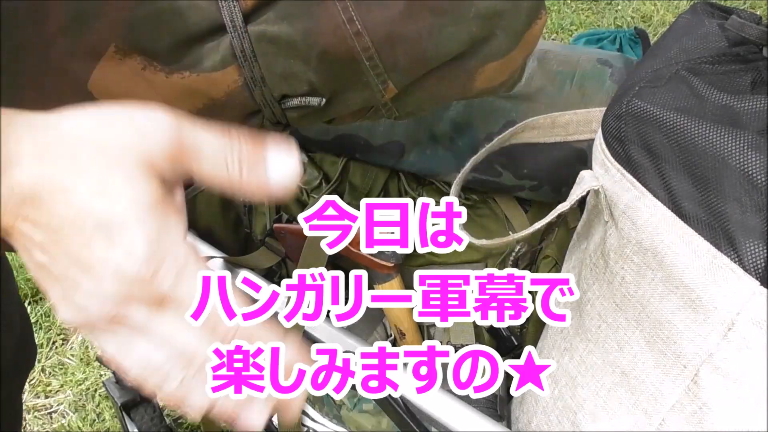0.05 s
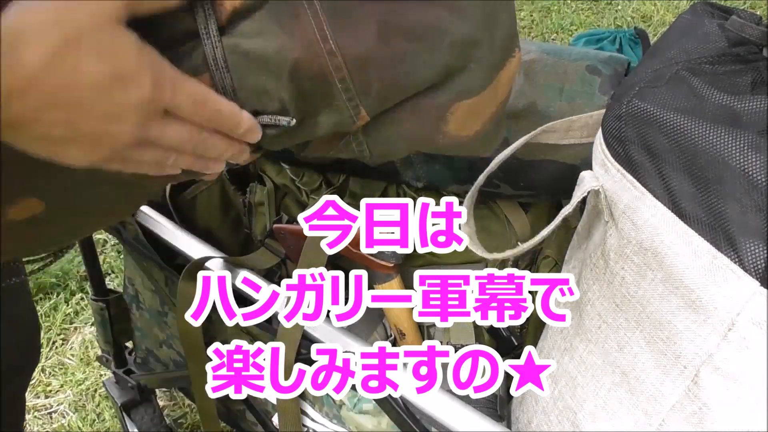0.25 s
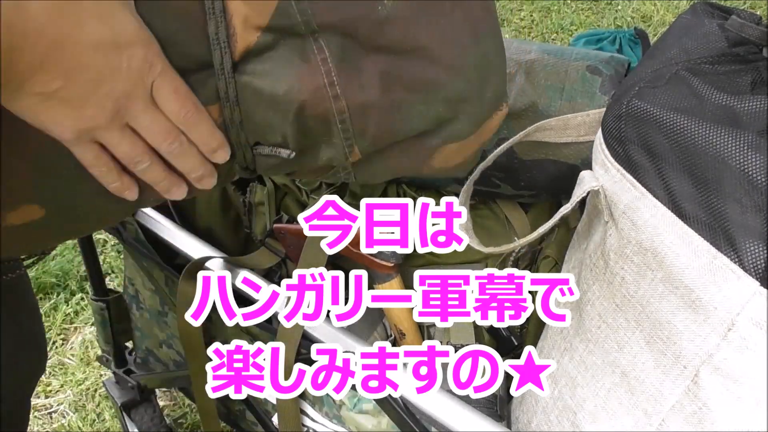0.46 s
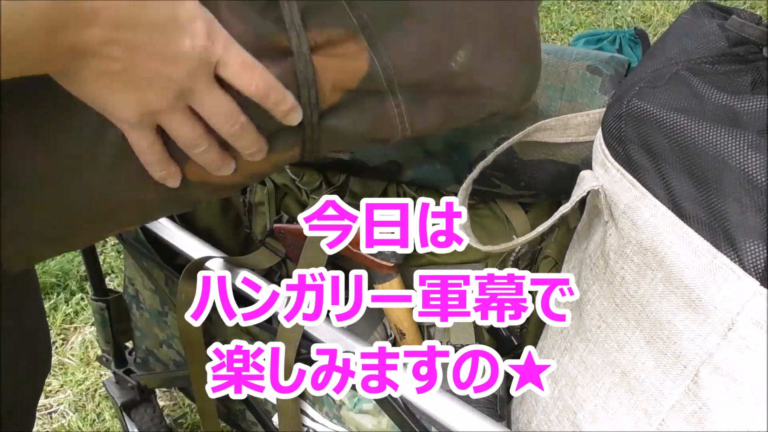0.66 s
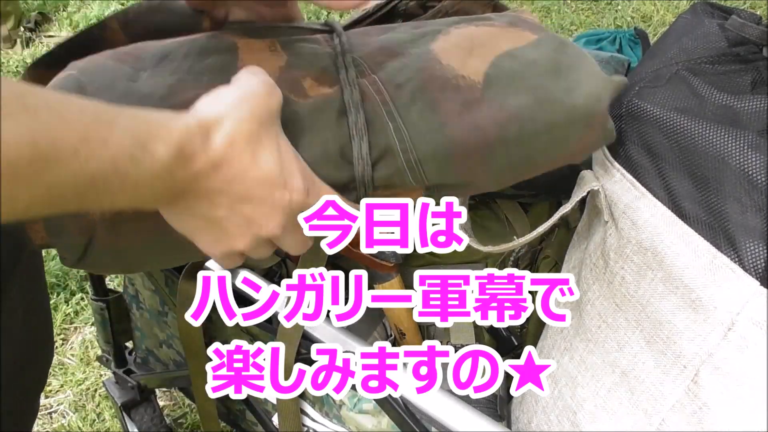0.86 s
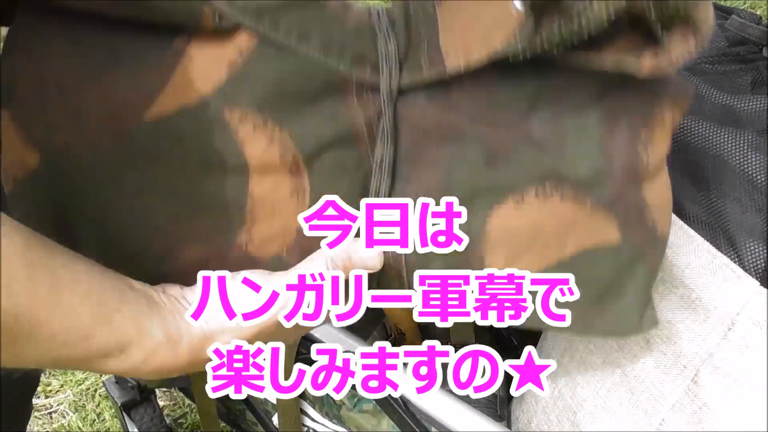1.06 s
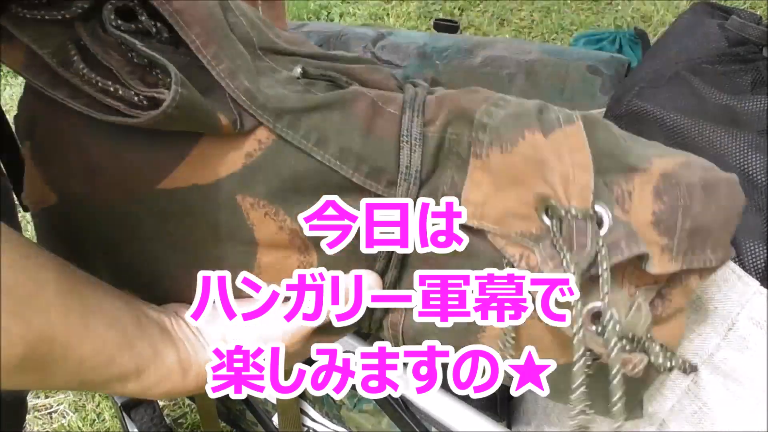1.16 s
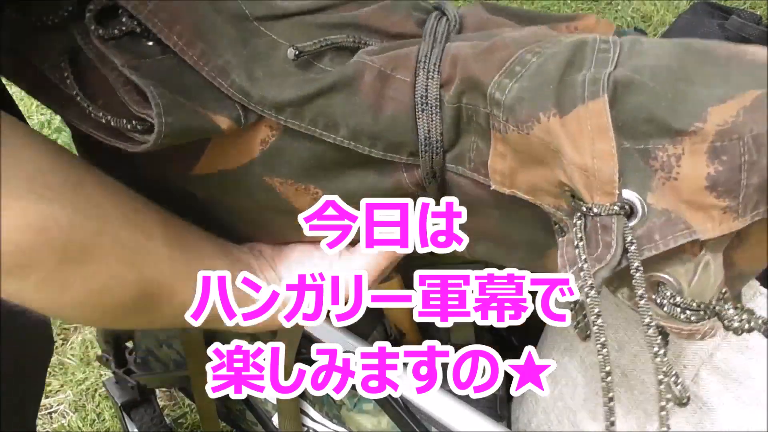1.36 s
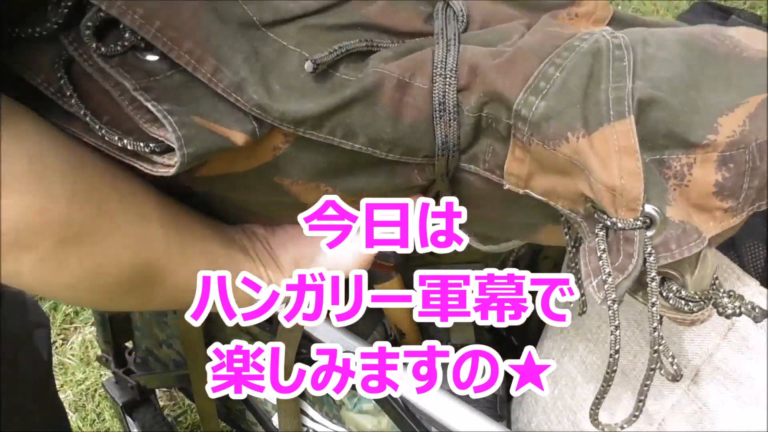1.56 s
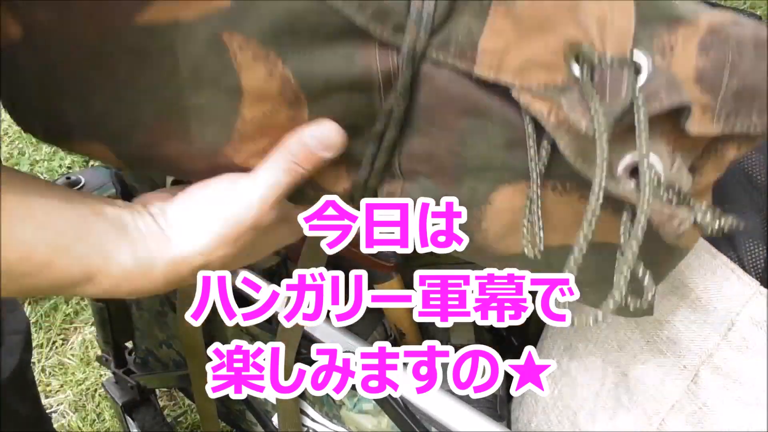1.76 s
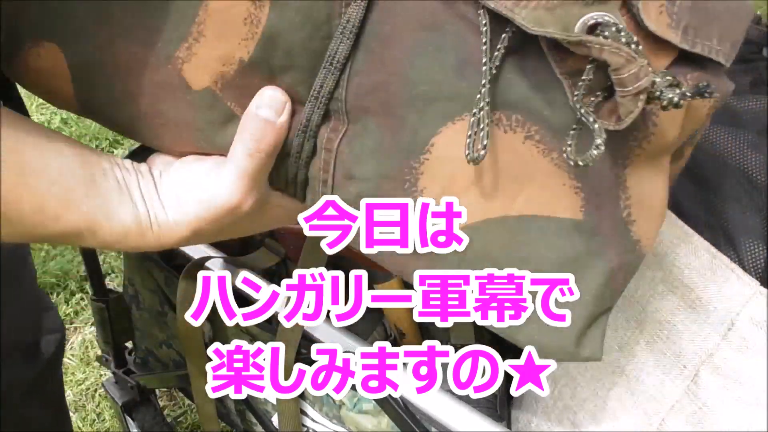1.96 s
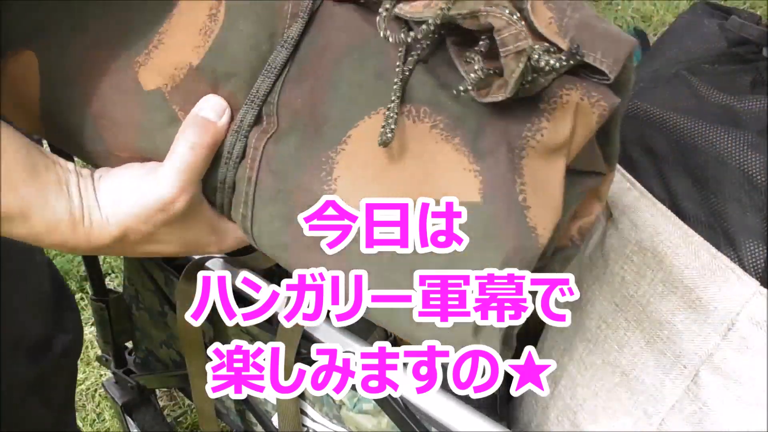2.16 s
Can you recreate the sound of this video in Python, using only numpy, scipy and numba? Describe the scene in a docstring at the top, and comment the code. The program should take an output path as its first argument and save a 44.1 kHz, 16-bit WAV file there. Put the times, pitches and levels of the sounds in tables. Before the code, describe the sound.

A hand pats packed canvas twice, slides over it and turns it with a quiet rustle.

```python
"""Outdoors, over a low rumble and a distant hum, a hand pats a rolled canvas bundle at 0.23 and 0.49 s.
Each pat is a few quick touches that crack on the cloth, puff out air and thump the packed roll;
an automatic volume control dips after each one. Around 0.75 s the hand slides and the weave hisses.
From about 1.1 s it lifts and turns the roll: folds rustle, cords tick, and softer bumps follow,
the last near 1.95 s."""
import sys
import numpy as np
from scipy import signal
from scipy.fft import rfft, irfft
from scipy.io import wavfile
from scipy.ndimage import uniform_filter1d
from numba import njit

SR = 44100
rng = np.random.default_rng(int(sys.argv[2]) if len(sys.argv) > 2 else 0)


def to_wav(sig):
    """Store sig (one row per channel, or 1-D mono) as 16-bit WAV at the path in sys.argv[1].

    Samples outside -1..1 are clipped; the rate is SR.
    """
    pcm = np.clip(np.atleast_2d(sig), -1, 1) * 32767
    pcm = np.round(pcm).astype(np.int16)
    wavfile.write(sys.argv[1], SR, pcm.T)  # frames by channels


N = 97020  # 2.2 s

# Fingers and palm touching the roll (time [s], crack strength [dB], crack length [s], thump strength [dB],
# thump pitch [Hz], air pop strength [dB], pop pitch [Hz], thump left minus right [dB])
TOUCHES = [(0.2322, -19, 0.0018, -31, 322, -33, 900, 0), (0.2343, -15, 0.0011, -8.5, 423, -26.5, 815, -5.5),
           (0.236, -18.5, 0.0016, -1.5, 164, -9.5, 830, 1), (0.2384, -25, 0.0031, -18, 254, -30, 940, 13),
           (.4900, -19.5, 0.0015, -44, 350, -15.5, 1220, -5),
           (0.4915, -12, 0.0016, -3.5, 389, -13.5, 1020, -6.5),
           (0.4945, -18.5, 0.0016, -12.5, 306, -24, 694, 11),
           (1.1433, -36.5, 0.003, -35, 198, -36, 1090, 10),
           (1.1545, -35.5, 0.0021, -28.5, 274, -33, 990, 2), (1.1578, -60, 0.0018, -28, 148, -35, 790, 5),
           (1.2557, -55, .002, -43, 466, -35, 695, 5), (1.951, -37, 0.0041, -26.5, 194, -41, 600, 6),
           (1.9569, -44.5, 0.0065, -19.5, 169, -33.5, 593, -3),
           (1.9690, -60, 0.0033, -38, 160, -35, 600, 1)]
# The hand sliding along the weave (peak time [s], level [dB], 20 dB rise [s], 20 dB fall [s])
SLIDES = [(.048, -52, 0.036, 0.011), (.172, -56.5, 0.079, 0.047), (.26, -48.5, 0.028, 0.029),
          (.34, -55.5, 0.025, 0.02), (.515, -47.5, 0.02, 0.052), (.752, -37, .15, 0.061),
          (.855, -51, 0.05, 0.06), (.99, -48.5, 0.046, 0.051), (1.058, -42, 0.056, 0.027),
          (1.141, -44, .009, 0.039), (1.30, -57.5, .2, 0.1), (1.60, -61, 0.42, 0.37),
          (1.838, -42, .05, 0.028), (1.858, -42, 0.028, 0.011), (1.941, -43, 0.016, 0.019),
          (1.975, -54.5, .04, 0.09)]
# Folds crumpling in the grip (peak time [s], level [dB], 20 dB rise [s], 20 dB fall [s])
GRIPS = [(.15, -47, 0.024, 0.058), (.19, -46.5, 0.05, 0.16), (.72, -56, 0.074, 0.089),
         (.99, -50.5, 0.038, 0.097), (1.15, -36, 0.0091, 0.028), (1.255, -49.5, 0.047, 0.035),
         (1.51, -49.5, 0.04, 0.11), (1.62, -50.5, .08, 0.053), (1.953, -42.5, 0.027, 0.052)]
# Cords and eyelets hitting the canvas (time [s], level [dB], length [s], band centre [Hz])
CORD_TICKS = [(0.179, -41.5, 0.0027, 4270), (0.225, -52, 0.0016, 8000), (1.19, -41, 0.0021, 1600),
              (1.259, -43, 0.00068, 5000), (1.5062, -35, 0.0012, 1510), (1.5136, -37, 0.0026, 2640),
              (1.639, -43.5, 0.002, 1390), (1.644, -47.5, .0012, 9500), (1.9448, -33.5, 0.0011, 3540)]
# The notes of the distant hum (pitch [Hz], level [dB])
HUM_NOTES = [(70, -56.5), (140, -56), (225, -59.5)]

# The tone of each noise, from low to high (frequency [Hz], relative level [dB])
CRACK_TONE = [(100, -40), (500, 9.5), (850, 4.5), (1250, 6.5), (1550, -9), (2200, -1.5), (2900, -6.5),
              (4100, -1), (4600, -12), (6500, -11), (7300, 0), (8300, 0), (9300, -2), (10500, -4),
              (13000, -12.5), (16000, -19)]  # a hand hitting canvas
WEAVE_TONE = [(900, -7), (1500, -16), (2300, -10), (2900, -15.5), (3800, -7.5), (4900, -13), (6500, -9.5),
              (7700, 1), (9000, 1.5), (11000, -3.5), (13000, -9.5), (15500, -14.5)]  # skin rubbing threads
FOLD_TONE = [(60, 1), (200, 16.5), (700, 2), (1200, -6), (1800, -10), (3000, -12.5), (4200, -17.5),
             (6000, -13), (12000, -33)]  # heavy folds moving
AIR_TONE = [(12, -27), (20, -7), (70, -0.5), (177, -8.5), (228, -6), (285, -13.5), (347, -12.5),
            (607, -16.5), (678, -13), (738, -15.5), (923, -17), (1710, -33.5), (2140, -31.5), (2750, -38),
            (3440, -31), (5230, -37), (8180, -29), (9400, -37.5), (16000, -49.5)]  # open air

# How wide each noise sounds (frequency [Hz], part that differs between the ears minus shared part [dB])
CRACK_WIDTH = [(200, -12), (1200, -8), (4000, -21), (8000, -18), (10500, -8), (13000, -4)]
CLOTH_WIDTH = [(500, -9.5), (1200, -4), (2500, -68), (6000, -80), (9000, -15), (12500, -6), (16000, -7)]
AIR_WIDTH = [(25, -4), (70, -5.5), (200, -10), (1000, -9.5), (2500, -20), (4400, -40), (8000, -14.5),
             (12000, 1)]
# How far ticks, cloth and air lean to the left (frequency [Hz], left minus right [dB])
LEFT_LEAN = [(100, 4.5), (700, 1.5), (1500, 0.5), (7500, -1), (10500, 2.5), (16000, -0.5)]

# T60 is the time a sound takes to fade by 60 dB.
THUMP_T60_S, THUMP_RISE_S, THUMP_LOW_HZ = 0.016, 0.00083, 79
BURST_RISE_S, POP_T60_S, SLAP_PAN_DB = 0.0003, 0.007, 1.8
FLAP_HZ, FLAP_T60_S, FLAP_DB = 519, 0.011, -1.5  # the tight outer cloth; level relative to the pop
WEAVE_GRAIN, FOLD_GRAIN, WEAVE_FLICKER_DB = 0.35, 0.53, 1.32  # more grain sounds rougher
TICK_BANDWIDTH = 1.7  # as a multiple of the band centre
ECHO_DB, ECHO_DELAY_S, ECHO_T60_S = -25.5, 0.0045, 0.09
AIR_DB, AIR_DRIFT_DB = -47.5, -0.5
HUM_WAVER, HUM_FLICKER_DB = 0.0274, 2.0  # the waver is a fraction of the pitch
DIP_ABOVE_DB, DIP_SLOPE = -18.5, 0.41  # the volume control cuts 0.41 dB for each dB above this level
DIP_ATTACK_S, DIP_RELEASE_S, TOP_HZ = 0.02, 0.19, 16000


def pats():
    """Each touch cracks on the cloth, squeezes out a pop of air and thumps the soft, packed roll."""
    crack_power, thump, pop = 0, 0, 0
    for at, crack_db, length, thump_db, thump_hz, pop_db, pop_hz, pan_db in TOUCHES:
        crack_power += (undb(crack_db) * burst(at, length)) ** 2
        push = 1 - np.exp(-since(at) / THUMP_RISE_S)
        thump -= pan(undb(thump_db) * push * ring(at, thump_hz, THUMP_T60_S), pan_db)
        flap = undb(FLAP_DB) * ring(at, FLAP_HZ, FLAP_T60_S)
        pop -= undb(pop_db) * (ring(at, pop_hz, POP_T60_S) + flap)
    # the roll is too small to give off deep bass
    thump = signal.sosfilt(signal.butter(2, THUMP_LOW_HZ, "high", fs=SR, output="sos"), thump)
    crack_noise = colour(noise(), CRACK_TONE) + widen(colour(noise(), CRACK_TONE), CRACK_WIDTH)
    slap = np.sqrt(crack_power) * crack_noise + pop
    return thump + pan(slap, SLAP_PAN_DB)


def rubbing():
    """Skin drags over the threads in a fine, bright hiss."""
    hiss = stereo(grains(WEAVE_GRAIN), grains(WEAVE_GRAIN), WEAVE_TONE, CLOTH_WIDTH)
    flicker = undb(WEAVE_FLICKER_DB * wander(hz=104))
    return hiss * swells(SLIDES) * flicker


def crumpling():
    """Heavy folds shift with a dull, grainy rustle."""
    rustle = stereo(grains(FOLD_GRAIN), grains(FOLD_GRAIN), FOLD_TONE, CLOTH_WIDTH)
    return rustle * swells(GRIPS)


def ticks():
    """Cords and eyelets flick the canvas, each sounding one broad band of its crack."""
    freqs = np.arange(1, N // 2 + 2) * SR / N
    out = 0
    for at, db, length, hz in CORD_TICKS:
        band = 1 / np.hypot(1, (freqs / hz - hz / freqs) / TICK_BANDWIDTH)
        tick_noise = unit(irfft(rfft(noise()) * band * gains(CRACK_TONE), N))
        out += undb(db) * burst(at, length) * tick_noise
    return lean(out)


def echo(x):
    """Sound bounces off nearby gear and the ground in a faint, short echo."""
    age = since(ECHO_DELAY_S)
    tail = rng.standard_normal((2, N)) * (age > 0) * undb(-60 * age / ECHO_T60_S)
    tail /= np.sqrt(np.sum(tail ** 2, axis=1, keepdims=True))
    return undb(ECHO_DB) * signal.fftconvolve(x, tail, axes=1)[:, :N]


def outdoors():
    """The open air rumbles low while a distant hum wavers in pitch and loudness."""
    air = stereo(noise(), noise(), AIR_TONE, AIR_WIDTH)
    hum = 0
    for hz, db in HUM_NOTES:
        level = undb(db + HUM_FLICKER_DB * wander(hz=27))
        pitch = hz * (1 + HUM_WAVER * wander(hz=16.23))
        hum += level * unit(np.sin(2 * np.pi * np.cumsum(pitch) / SR))
    return air * undb(AIR_DB + AIR_DRIFT_DB * wander(hz=5.1)) + hum


def undb(db):
    """Turn decibels into a number to multiply by."""
    return 10 ** (np.asarray(db) / 20)


def unit(x):
    """Scale a sound to an average (rms) level of 1."""
    return x / np.sqrt(np.mean(x ** 2))


def noise():
    """White noise: an even hiss."""
    return rng.standard_normal(N)


def grains(spread):
    """Many tiny snags of uneven size, each lasting a third of a millisecond."""
    sizes = np.exp(spread * np.clip(noise(), -2, 2))
    return noise() * np.repeat(sizes, 15)[:N]


def wander(hz):
    """A smooth random drift with a typical size of 1; more hz makes it faster."""
    window = int(SR / hz)
    return unit(uniform_filter1d(uniform_filter1d(noise(), window), window))


def since(start):
    """Seconds since a moment, zero before it."""
    return np.maximum(np.arange(N) / SR - start, 0)


def burst(start, length):
    """A loudness curve that jumps up and dies away."""
    age = since(start)
    shape = (1 - np.exp(-age / BURST_RISE_S)) * np.exp(-age / length)
    return shape / shape.max()


def ring(start, hz, t60):
    """One struck note that fades."""
    age = since(start)
    return np.sin(2 * np.pi * hz * age) * np.exp(-np.log(1000) * age / t60)


def swells(rows):
    """One loudness curve for several movements that each grow to a peak and fade."""
    t = np.arange(N) / SR
    power = 0
    for at, db, rise, fall in rows:
        from_peak = np.maximum((at - t) / rise, (t - at) / fall)
        power += undb(db - 20 * from_peak ** 2.05) ** 2
    return np.sqrt(power)


def gains(points):
    """Join (frequency [Hz], level [dB]) points into a multiplier for every frequency."""
    hz, db = np.array(points).T
    freqs = np.arange(N // 2 + 1) * SR / N
    return undb(np.interp(np.log(freqs + 1e-3), np.log(hz), db))


def colour(x, tone):
    """Give a sound a tone, at an average level of 1."""
    return unit(irfft(rfft(x) * gains(tone), N))


def pan(x, db):
    """Place a sound left (+) or right (-)."""
    return x * undb(np.array([[db], [-db]]) / 2)


def lean(x):
    """Set the lows and the highs near 10 kHz a little to the left."""
    return irfft(rfft(x) * gains(LEFT_LEAN) ** np.array([[.5], [-.5]]), N)


def widen(side, width):
    """Shape a sound and send it to the two ears with opposite signs."""
    return irfft(rfft(side) * gains(width), N) * np.array([[1], [-1]])


def stereo(middle, side, tone, width):
    """Make one wide sound from two noises given the same tone."""
    return lean(colour(middle, tone)) + widen(colour(side, tone), width)


def scene():
    """The handled bundle and its echo in front of the open air."""
    bundle = pats() + ticks() + rubbing() + crumpling()
    return bundle + echo(bundle) + outdoors()


@njit
def follow_peaks(x, release):
    """A level that jumps up with each peak and sinks slowly."""
    out, level = np.empty(len(x)), 0.
    for i in range(len(x)):
        level = max(x[i], level * release)
        out[i] = level
    return out


def record(dry):
    """The automatic volume control dips after loud peaks and recovers; the very top is cut off."""
    peak = follow_peaks(np.abs(dry).max(axis=0), np.exp(-1 / (DIP_RELEASE_S * SR)))
    cut_db = DIP_SLOPE * np.maximum(20 * np.log10(peak + 1e-9) - DIP_ABOVE_DB, 0)
    lag = np.exp(-1 / (DIP_ATTACK_S * SR))
    smooth_cut_db = signal.lfilter([1 - lag], [1, -lag], cut_db)
    top_cut = signal.ellip(8, .2, 80, TOP_HZ, fs=SR, output="sos")
    return signal.sosfilt(top_cut, dry * undb(-smooth_cut_db))


dry = scene()
out = record(dry)
to_wav(out)
```